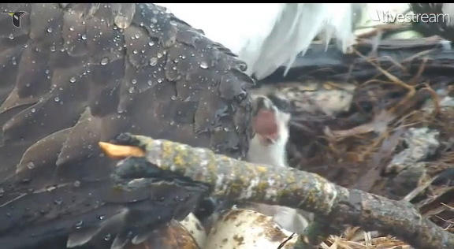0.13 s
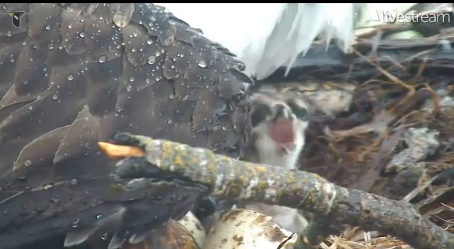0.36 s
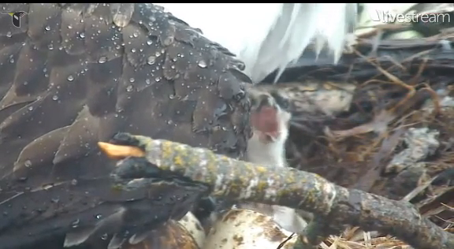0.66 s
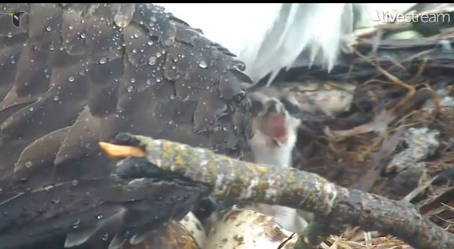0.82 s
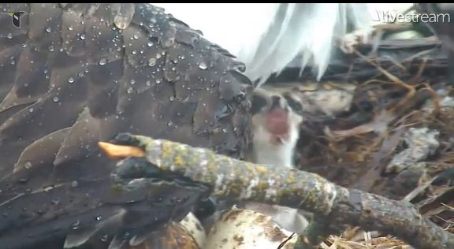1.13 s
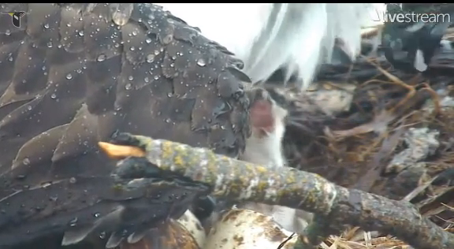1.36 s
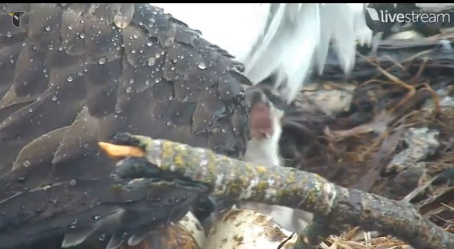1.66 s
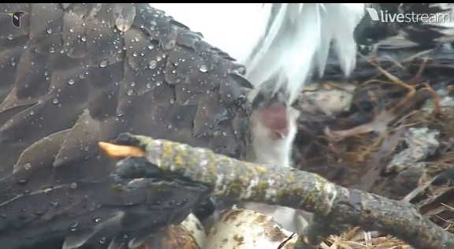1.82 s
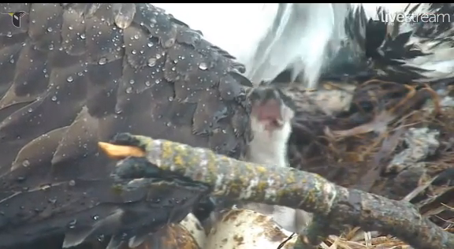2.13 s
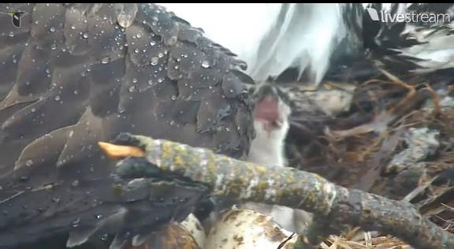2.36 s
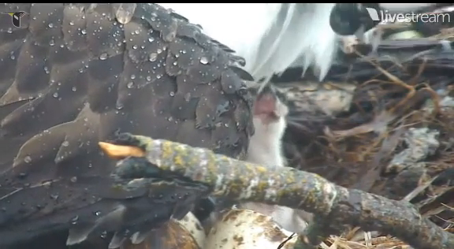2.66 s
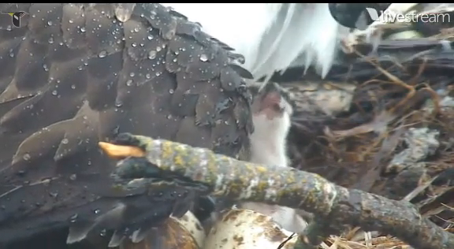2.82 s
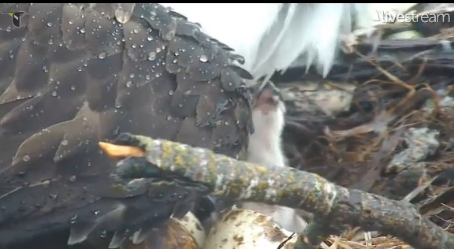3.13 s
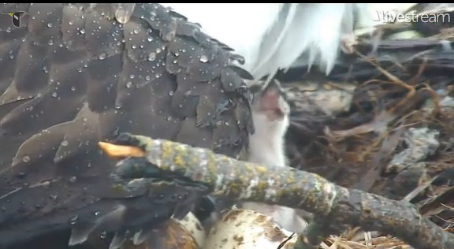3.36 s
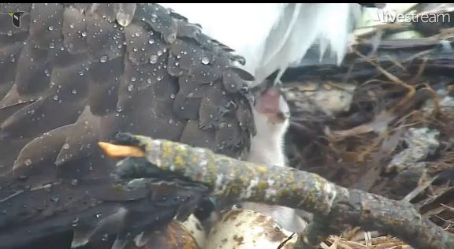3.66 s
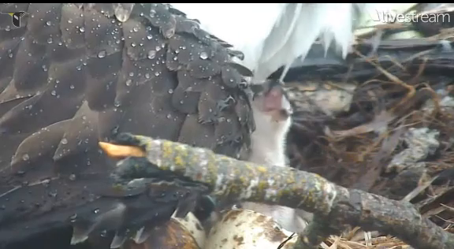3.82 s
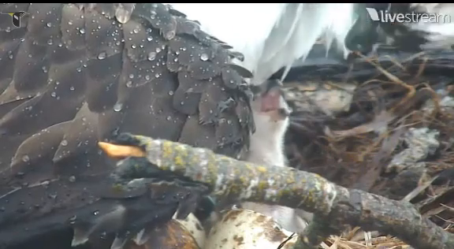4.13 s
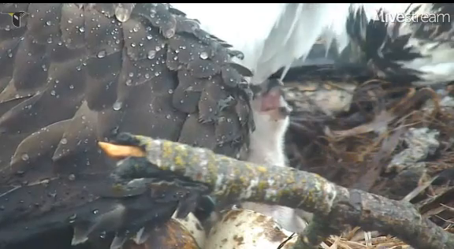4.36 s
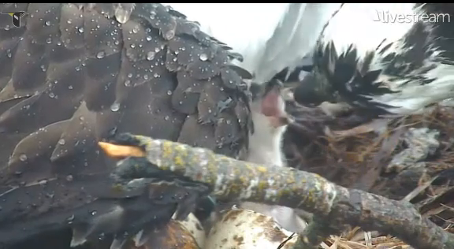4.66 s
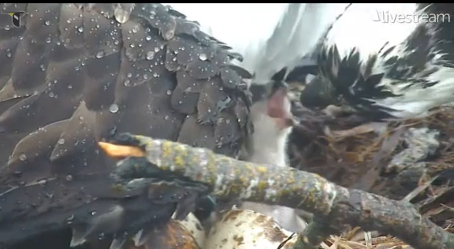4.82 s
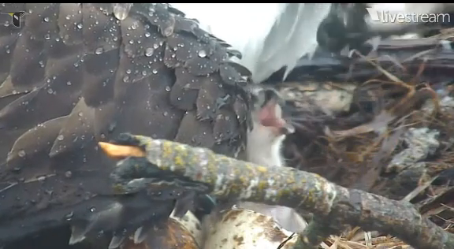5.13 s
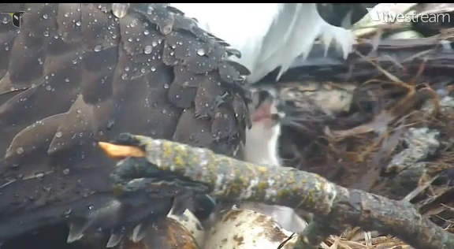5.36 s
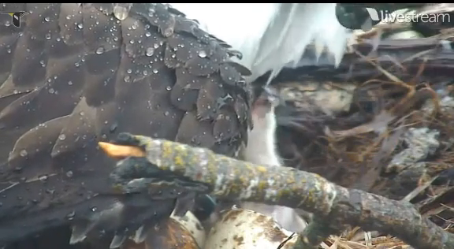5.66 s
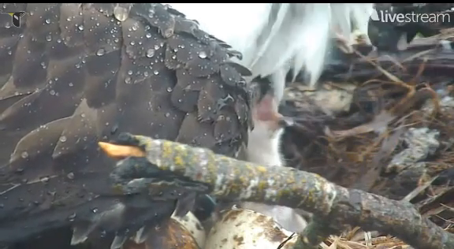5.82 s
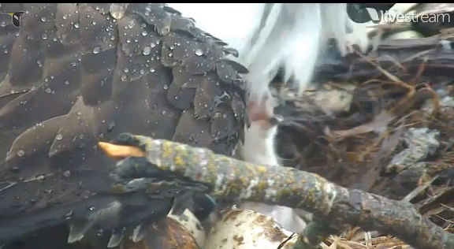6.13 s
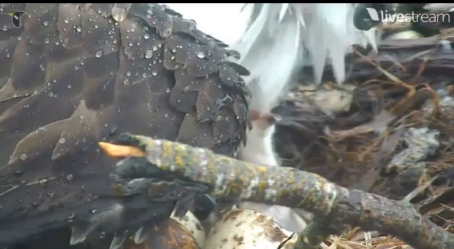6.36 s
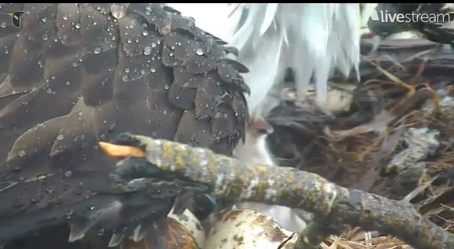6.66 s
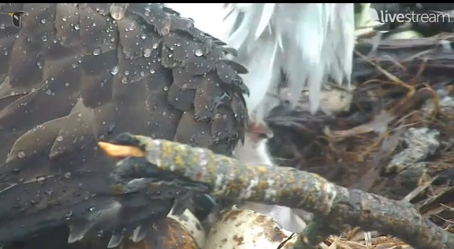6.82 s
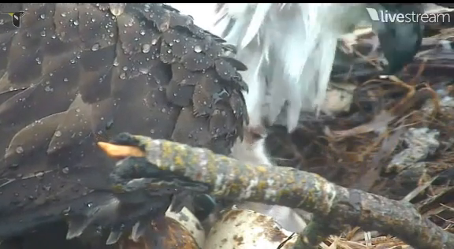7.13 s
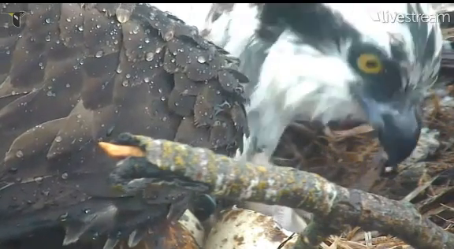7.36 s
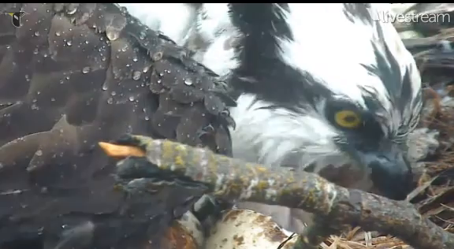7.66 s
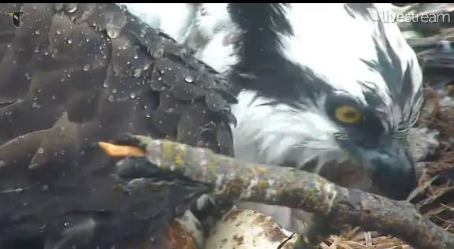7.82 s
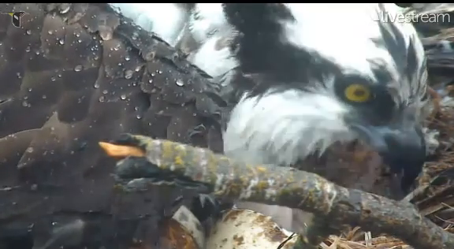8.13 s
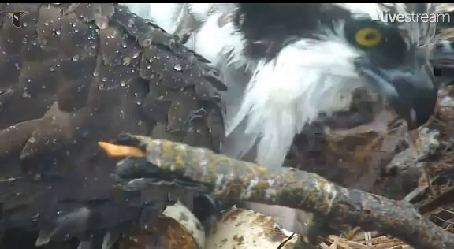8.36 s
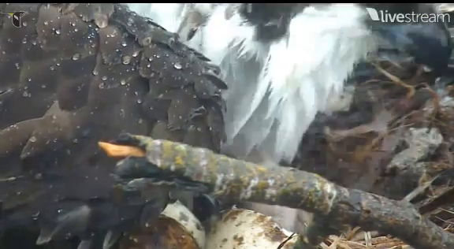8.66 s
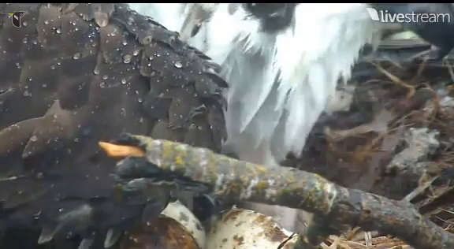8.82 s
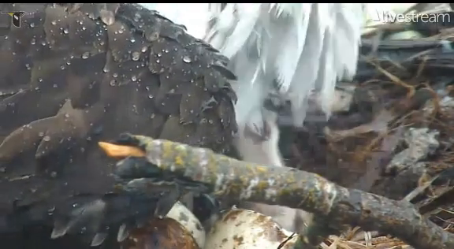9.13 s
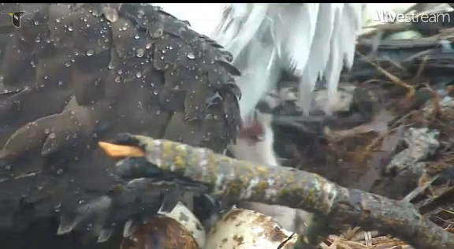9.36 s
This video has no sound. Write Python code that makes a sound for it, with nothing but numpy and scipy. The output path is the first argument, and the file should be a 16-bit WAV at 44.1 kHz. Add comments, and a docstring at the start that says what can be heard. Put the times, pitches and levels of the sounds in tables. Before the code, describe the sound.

Steady microphone hiss and faint hum, sharp raindrop taps, two short arched osprey whistles with tiny pips, and a distant songbird twittering.

```python
"""At an osprey nest in light rain, close to a nest camera, the osprey gives two arched whistles and four pips.
These and the chick's thin wheezes are sums of partials; drops are damped rings or filtered noise bursts,
and one such burst is a dull beak click at the onset of a pip. A far songbird twitters by frequency glides
with a diffuse echo, over filtered-noise hiss and mains hum. One microphone feeds the left channel.
Source levels are relative; the scene doubles them all."""
import sys
import numpy as np
from scipy import signal
from scipy.fft import rfft, irfft, next_fast_len
from scipy.io import wavfile
from scipy.ndimage import map_coordinates

SR = 44100
rng = np.random.default_rng(int(sys.argv[2]) if len(sys.argv) > 2 else 0)


def generate_wav(sig):
    """Save sig (samples, or channels by samples) to the path in sys.argv[1] as 16-bit PCM at SR."""
    pcm = np.round(np.clip(np.atleast_2d(sig).T, -1, 1) * 32767).astype(np.int16)
    wavfile.write(sys.argv[1], SR, pcm)


N = 418509

# common spectrum of the ticks and the drizzle: (frequency [Hz], gain [dB])
TICK_SPECTRUM = [(2500, -20.5), (4000, 14.5), (6500, 4.5), (8500, -3), (10500, -21), (13000, -15.5)]


def amp(db):
    """Decibels to amplitude ratio: 20 dB is a factor of ten."""
    return 10 ** (np.asarray(db) / 20)


def unit(x):
    """Normalisation to an rms of 1."""
    return x / np.sqrt(np.mean(x ** 2) + 1e-20)


def add(track, s, sound):
    """Superposition: mix a sound into the track at time s in seconds."""
    i = max(round(s * SR), 0)
    track[i:i + len(sound)] += sound[:max(N - i, 0)]


def wobble(rate, size):
    """Band-limited fluctuation: a smooth curve through random knots, rate of them a second."""
    knots = rng.standard_normal(int(size * rate / SR) + 4)
    return map_coordinates(knots, [np.arange(size) * rate / SR])


def coloured(x, points):
    """Linear filtering: x through (Hz, dB) points joined on a log-frequency axis."""
    m = next_fast_len(len(x) + 8192)
    hz, db = np.transpose(points)
    log_hz = np.log(np.fft.rfftfreq(m, 1 / SR) + 1)
    gain = amp(np.interp(log_hz, np.log(hz), db))
    return irfft(rfft(x, m) * gain, m)[:len(x)]


def noise(points):
    """Stationary coloured noise of rms 1."""
    return unit(coloured(rng.standard_normal(N), points))


def progress(length):
    """Normalised time, 0 to 1 over a length in seconds."""
    return np.linspace(0, 1, max(int(length * SR), 8))


def arch(u, power):
    """Half-sine envelope that starts and ends in silence; a higher power narrows it."""
    return np.abs(np.sin(np.pi * u)) ** power


def phase_of(hz):
    """Frequency modulation: phase is the running integral of frequency."""
    return 2 * np.pi * np.cumsum(hz) / SR


def osprey_whistles(jitter=0.0024, shimmer_db=.35, lean=.88):
    """Effort-dependent spectrum: pitch and level arch together, and high partials need a loud call."""
    # (start [s], length [s], start pitch [Hz], top pitch [Hz], end pitch [Hz], level [dB], octave [dB])
    whistles = [(2.128, 0.097, 1500, 1788, 1430, -25, -3), (4.179, 0.1, 1564, 1840, 1392, -22.5, -2)]
    # upper partials at full effort: (multiple of the pitch [ratio], level [dB])
    edge_partials = [(3, -25.5), (4, -45.5), (5, -53)]
    out = np.zeros(N)
    loudest = amp(max(row[5] for row in whistles))
    for s, length, start_hz, top_hz, end_hz, db, octave_db in whistles:
        u = progress(length) ** lean  # the rise is quicker than the fall
        depth_hz = np.where(u < .5, top_hz - start_hz, top_hz - end_hz)
        pitch_hz = top_hz - depth_hz * (2 * u - 1) ** 2
        phase = phase_of(pitch_hz * (1 + jitter * wobble(660, len(u))))
        effort = amp(db + shimmer_db * wobble(300, len(u))) * arch(u, 1.23)
        octave = amp(octave_db) * arch(u, .1) * np.cos(2 * phase)
        edge = sum(amp(partial_db) * np.cos(k * phase) for k, partial_db in edge_partials)
        add(out, s, effort * (np.sin(phase) + octave + (effort / loudest) ** 2 * edge))
    return out


def osprey_pips(octave_db=-14, glide=0.076):
    """Brief harmonic tones: a gliding fundamental and its octave; glide is the fall as a share of pitch."""
    # (start [s], length [s], middle pitch [Hz], level [dB])
    pips = [(4.098, 0.0064, 1730, -29), (6.17, 0.015, 1770, -34), (7.2, 0.011, 1705, -25),
            (9.214, 0.0072, 1750, -31.5)]
    out = np.zeros(N)
    for s, length, hz, db in pips:
        u = progress(length)
        phase = phase_of(hz * (1 + glide * (.5 - u)))
        tone = np.sin(phase) + amp(octave_db) * np.sin(2 * phase)
        add(out, s, amp(db) * arch(u, 0.58) * tone)
    return out


def chick(rasp=0.071, flick=0.19, flick_s=0.015, swell_db=8):
    """Random frequency modulation roughens a swelling tone, which flicks down as the beak closes."""
    # (start [s], length [s], pitch before the flick [Hz], relative level [dB])
    wheezes = [(0.463, 0.082, 8050, -60.5), (1.093, .19, 6970, -63), (1.716, .275, 6800, -61),
               (4.433, 0.22, 6160, -56), (5.12, 0.13, 6700, -60), (5.968, 0.038, 8100, -63.5),
               (6.52, 0.19, 6880, -62), (7.07, .16, 7040, -64)]
    # (multiple of the pitch [ratio], level [dB])
    partials = [(1, 4), (1.25, -8), (1.5, -11.5)]
    out = np.zeros(N)
    for s, length, hz, db in wheezes:
        u = progress(length)
        fall = 1 - flick * np.exp(-(1 - u) * length / flick_s)
        phase = phase_of(hz * fall * (1 + rasp * wobble(1500, len(u))))
        tone = sum(amp(partial_db) * np.sin(k * phase) for k, partial_db in partials)
        level = amp(db + swell_db * (u - 2.5) + 2.2 * wobble(200, len(u)))
        add(out, s, level * arch(u, 0.13) * tone)
    return out


def ring(hz, swell):
    """Damped resonance whose envelope peaks after swell seconds, radiating by its rate of change."""
    t = np.arange(SR // 50) / SR
    envelope = (t / swell * np.exp(1 - t / swell)) ** 2
    pressure = np.gradient(envelope * np.sin(2 * np.pi * hz * t))
    return pressure / np.abs(pressure).max()


def housing_drops(thud_hz=760, thud_swell=0.00054, snap_hz=9200, snap_swell=0.00014):
    """Impact excitation of modes: a near drop rings the housing for a few cycles, with a thud and a snap."""
    # (start [s], ring peak [dB], ring frequency [Hz], swell [s], thud peak [dB], snap peak [dB])
    impacts = [(0.2537, -24, 2410, 0.00039, -33, -58), (1.3287, -9.5, 2450, 0.0004, -47, -30.5),
               (1.4992, -25, 2090, 0.00066, -57, -56), (2.6215, -16, 2410, 0.00044, -21, -51),
               (3.7, -39, 2500, .0007, -49, -72)]
    out = np.zeros(N)
    for s, db, hz, swell, thud_db, snap_db in impacts:
        thud = amp(thud_db) * ring(thud_hz, thud_swell)
        snap = amp(snap_db) * ring(snap_hz, snap_swell)
        add(out, s, amp(db) * ring(hz, swell) + thud + snap)
    return out


def twig_ticks_and_beak_click(tick_t60=0.0099, tick_db=2, edge_db=65):
    """Decaying broadband bursts, cut by edge_db per octave above a top edge: twig drops and one beak click."""
    # The row at 4.099 s is a dull beak click at the onset of the osprey's pip; the others are drops on twigs.
    # (start [s], relative peak [dB], brightness [dB per octave], top edge [Hz])
    tick_rows = [(.186, -53, 1, 12000), (0.211, -47, -5, 12000), (0.2533, -48, 3, 12000),
                 (.904, -56, 5, 12000), (1.5004, -55, 9, 12000), (2.141, -49, 10.5, 13000),
                 (3.539, -53.5, 11, 13000), (3.76, -51, 14.5, 13000), (4.099, -33, -8, 8000),
                 (4.972, -53, 2.5, 12000), (5.861, -48, 2, 12000), (7.43, -38.5, -1, 7960),
                 (8.013, -54, 2, 12000), (8.956, -51, 2, 12000), (9.213, -49, 1.5, 11900)]
    out = np.zeros(N)
    t = np.arange(SR // 50) / SR
    for s, db, bright_db, top_hz in tick_rows:
        colour = []
        for hz, level in TICK_SPECTRUM:
            octaves_above = max(np.log2(hz / top_hz), 0)
            colour.append((hz, level + bright_db * np.log2(hz) - edge_db * octaves_above))
        burst = amp(-60 * t / tick_t60) * rng.standard_normal(len(t))
        tick = coloured(burst, colour)
        add(out, s, amp(db + tick_db) * tick / np.abs(tick).max())
    return out


def drizzle(rate=25, level_db=-79, spread_db=4):
    """Random impulse train: fine drops land all over the nest, rate of them a second on average."""
    hits = (rng.random(N) < rate / SR) * amp(spread_db * rng.standard_normal(N))
    return amp(level_db) * unit(coloured(hits, TICK_SPECTRUM))


def songbird_voice(hz, warble=.012, rasp_db=2.4):
    """Random frequency and amplitude modulation make a tone raspy; warble is a share of its pitch."""
    phase = phase_of(hz * (1 + warble * wobble(900, len(hz))))
    return np.sin(phase) * amp(rasp_db * wobble(900, len(hz)))


def songbird_song():
    """Frequency glides: each kind of call traces a pitch and level contour, and loose peeps glide straight."""
    # Contours: (time after the start [s], pitch before scaling [Hz], relative level [dB])
    cheep = [(0, 4150, -1), (.009, 5200, -2), (.02, 5280, 1.5), (.03, 5180, -5.5), (.039, 4050, 1.5),
             (.051, 3894, -6), (.061, 4355, 0), (.068, 5000, -4.5), (.077, 4500, -3.5), (.086, 3284, -13),
             (.095, 3590, 8.5), (.11, 4250, -2.5), (.122, 4180, -6.5)]  # a held top note, a quick loop and a low upsweep
    cheep_upper = [(.002, 5360, -9), (.012, 5930, -12.5), (.021, 5640, -13.5), (.028, 5960, -13),
                   (.038, 5650, -15.5), (.055, 5600, -13), (.07, 5600, -25)]  # the second side of the syrinx sings above the top note
    chirrup = [(0, 4210, -9), (.008, 5000, -4), (.018, 5335, -2.5), (.023, 4120, -6), (.032, 5300, -5),
               (.039, 4110, -2), (.047, 4080, -2.5), (.055, 4150, 0.5), (.063, 3340, -6), (.072, 3500, 8.5),
               (.081, 3885, 7), (.09, 3540, 9.5), (.1, 3570, -5), (.106, 3450, -14)]  # tumbles down in three warbled steps
    chirrup_under = [(0, 4050, -3), (.012, 4500, -2), (.02, 4150, -5), (.036, 4520, -9)]  # a lower voice wavers under the opening
    chip = [(0, 3880, -2.5), (.009, 4750, -6), (.02, 4340, -1), (.033, 4280, 2.5), (.039, 4450, -4.5)]  # a scoop up that settles on a short ledge
    slur = [(0, 5400, -3), (.022, 5070, -4.5), (.043, 4550, 2), (.056, 3500, 7.5)]  # falls ever faster
    # Calls: (start [s], pitch factor [ratio], level at the start [dB], level at the end [dB])
    cheep_calls = [(.756, 0.97, -43, -49), (2.42, 0.97, -41.5, -44.5), (3.788, 0.98, -47, -48),
                   (5.219, 0.98, -42, -48), (6.246, 0.99, -46.5, -50), (8.254, 0.95, -43, -44)]
    chirrup_calls = [(1.169, 0.95, -48, -43), (4.253, 0.96, -45, -44.5), (9.185, 0.98, -46, -48)]
    chip_calls = [(3.012, .97, -46, -46), (6.852, .84, -43.5, -41), (7.246, 1.0, -43, -42),
                  (8.997, 1.0, -43, -43)]
    slur_calls = [(3.306, 0.95, -49, -50), (8.712, 0.98, -53, -49)]
    # Loose peeps: (start [s], length [s], start pitch [Hz], end pitch [Hz], level [dB])
    peeps = [(1.555, .025, 5240, 5120, -56.5), (2.858, .022, 4000, 4550, -47),
             (2.867, .014, 5200, 5050, -54), (3.898, .009, 5000, 5300, -52), (3.936, .014, 4230, 4040, -46),
             (5.785, .025, 5200, 5000, -52), (6.545, .03, 4400, 3900, -45.5), (6.608, .03, 3700, 3500, -41),
             (7.203, .024, 4920, 5320, -53), (7.259, 0.014, 3320, 3600, -38.5),
             (7.277, .011, 3290, 4100, -36), (7.294, 0.014, 3630, 3590, -36),
             (7.307, 0.0098, 3700, 4500, -44)]
    repertoire = [(cheep, cheep_calls), (cheep_upper, cheep_calls), (chirrup, chirrup_calls),
                  (chirrup_under, chirrup_calls), (chip, chip_calls), (slur, slur_calls)]
    out = np.zeros(N)
    for contour, calls in repertoire:
        times, pitch_hz, contour_db = np.transpose(contour)
        u = progress(times[-1])
        hz = np.interp(u * times[-1], times, pitch_hz)
        swell_db = np.interp(u * times[-1], times, contour_db)
        for s, factor, start_db, end_db in calls:
            level = amp(swell_db + start_db + (end_db - start_db) * u)
            add(out, s, level * arch(u, 0.18) * songbird_voice(factor * hz))
    for s, length, start_hz, end_hz, db in peeps:
        u = progress(length)
        glide_hz = start_hz + (end_hz - start_hz) * u
        add(out, s, amp(db) * arch(u, 0.67) * songbird_voice(glide_hz))
    return out


def songbird(echo_t60=0.3, branches_t60=.05, branches_db=8, direct_db=-1.5, trees_db=-5.5):
    """Diffuse scattering: decaying noise responses of near branches and the trees behind blur the song."""
    song = songbird_song()
    t = np.arange(SR // 2) / SR
    decay = amp(-60 * t / echo_t60) + amp(branches_db - 60 * t / branches_t60)
    response = rng.standard_normal(len(t)) * decay
    echo = signal.fftconvolve(song, response / np.linalg.norm(response))[:N]
    return amp(direct_db) * song + amp(trees_db) * echo


def hiss(body_db=1, air_db=-30, waver_db=0.55):
    """Resonantly coloured noise: an almost even hiss, peaked by the small microphone's resonance."""
    # (time [s], relative level [dB])
    level_points = [(0.0, -41), (0.32, -40.5), (1.5, -40.5), (2.4, -39.5), (3.3, -39), (4.6, -39),
                    (6.48, -38), (8.1, -39), (9.49, -40)]
    # spectrum of the mid-range body: (frequency [Hz], relative gain [dB])
    body_spectrum = [(25, -36), (100, -28), (250, -25.5), (500, -19), (850, -14), (1150, -8), (1500, -7),
                     (1900, -0.5), (2450, 3), (3000, -3.5), (3500, -7), (4100, -14.5), (4750, -19),
                     (5500, -28.5), (6500, -54.5)]
    # spectrum of the faint treble: (frequency [Hz], relative gain [dB])
    air_spectrum = [(3000, -3), (5500, 9.5), (7000, 0.5), (8500, -2), (10500, -15), (12200, -16),
                    (13300, -35)]
    level = amp(np.interp(np.arange(N) / SR, *np.transpose(level_points)))
    body = amp(body_db + waver_db * wobble(8, N)) * noise(body_spectrum)
    air = amp(air_db) * noise(air_spectrum)
    return level * (body + air)


def hum():
    """Harmonic line spectrum of rectified mains ripple in the microphone's supply."""
    # (frequency [Hz], rms level [dB])
    lines = [(120, -67), (240, -70), (360, -76.5)]
    t = np.arange(N) / SR
    return sum(np.sqrt(2) * amp(db) * np.sin(2 * np.pi * (hz * t + rng.random())) for hz, db in lines)


def scene():
    """Superposition at one microphone on the left channel; the right one is unconnected."""
    birds = osprey_whistles() + osprey_pips() + chick() + songbird()
    impacts = housing_drops() + twig_ticks_and_beak_click() + drizzle()
    microphone = birds + impacts + hiss() + hum()
    return np.array([2 * microphone, np.zeros(N)])


def record(dry, top=0.5, hardness=9, idle_db=-91, top_hz=13300):
    """Saturation and band-limiting: the preamplifier flattens the sharpest taps, noise joins, treble is cut."""
    clipped = dry / (1 + np.abs(dry / top) ** hardness) ** (1 / hardness)
    # a trace of converter noise in both channels
    wet = clipped + amp(idle_db) * rng.standard_normal(dry.shape)
    m = next_fast_len(N + 8192)
    passband = np.fft.rfftfreq(m, 1 / SR) < top_hz
    return irfft(rfft(wet, m) * passband, m)[:, :N]


dry = scene()
out = record(dry)
generate_wav(out)
```